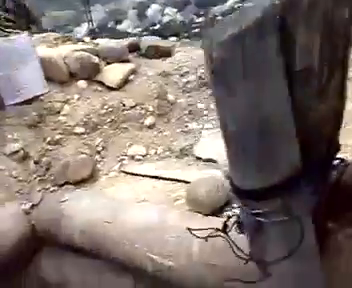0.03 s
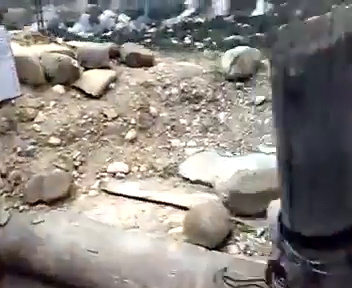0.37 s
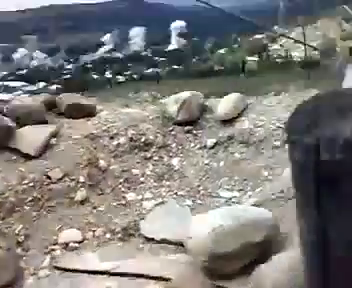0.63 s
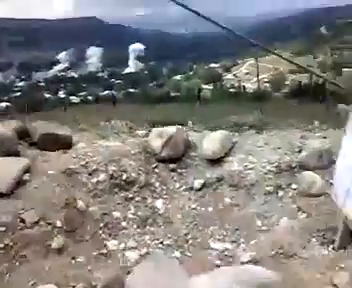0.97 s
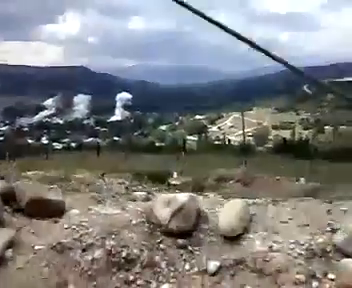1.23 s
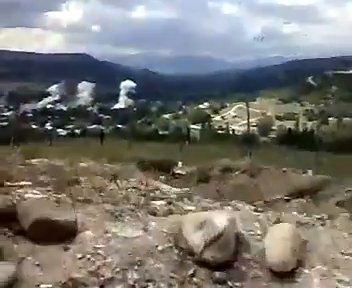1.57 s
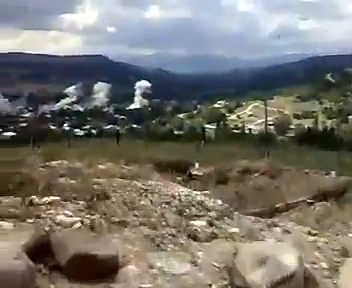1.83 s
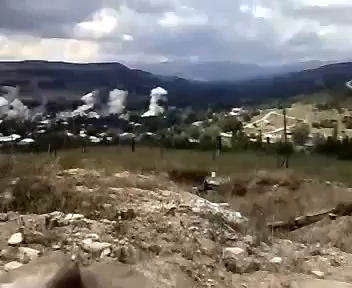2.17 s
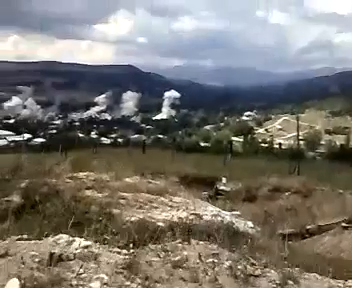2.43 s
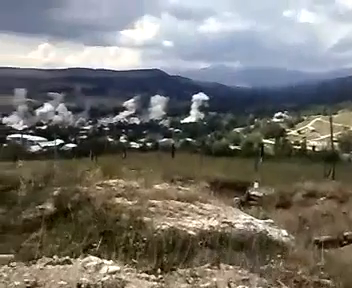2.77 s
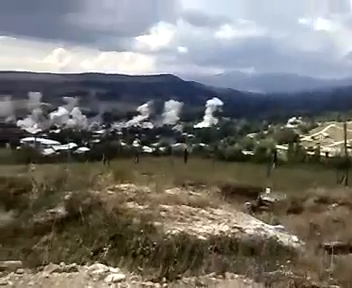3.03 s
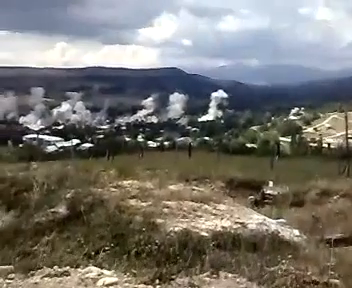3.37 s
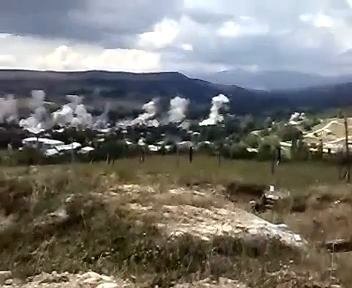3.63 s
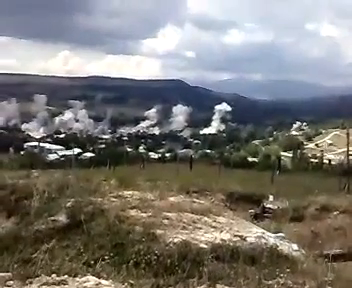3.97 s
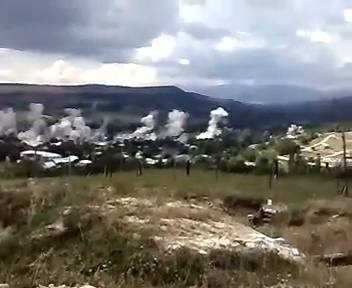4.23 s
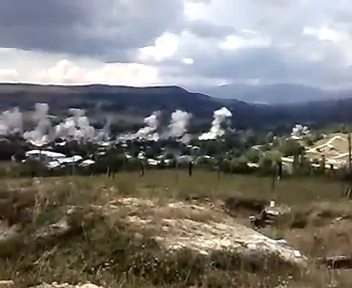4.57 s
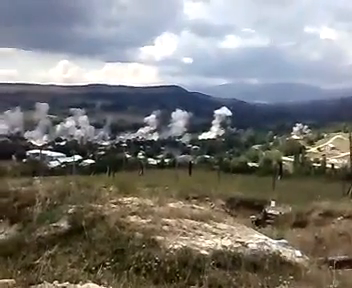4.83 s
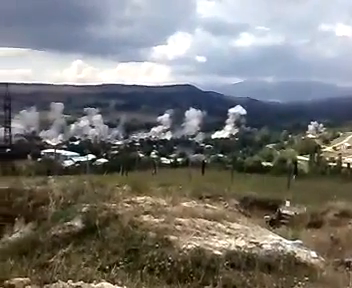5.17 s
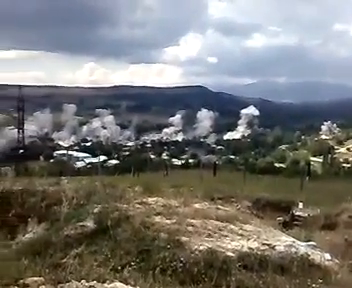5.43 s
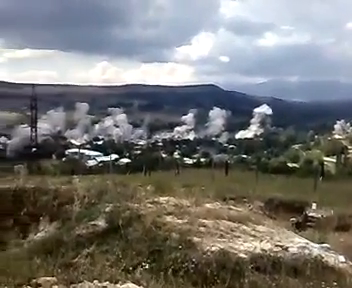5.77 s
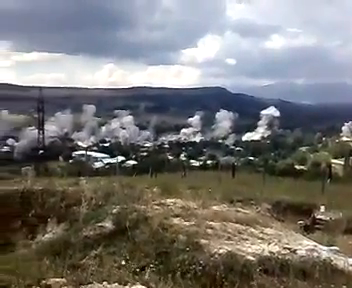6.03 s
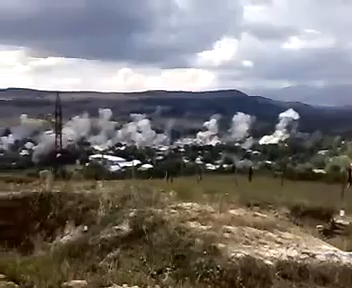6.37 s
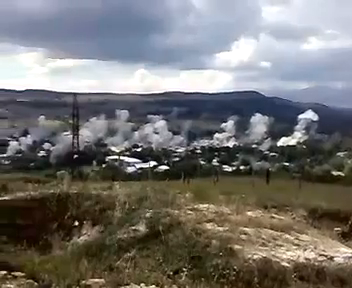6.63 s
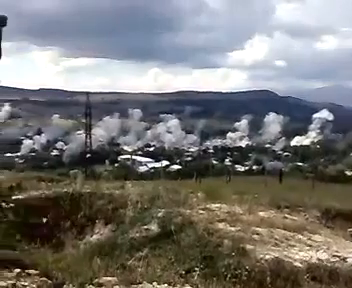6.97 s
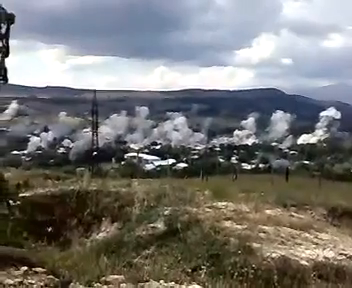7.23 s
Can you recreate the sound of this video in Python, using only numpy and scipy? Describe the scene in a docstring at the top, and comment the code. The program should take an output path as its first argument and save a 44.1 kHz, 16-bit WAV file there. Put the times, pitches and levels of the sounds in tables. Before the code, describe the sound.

Distant artillery shells explode in a rapid overlapping string of booms that roll across a valley, followed by wind gusts and a faint engine hum.

```python
"""Shellfire across a valley

A salvo is heard from a hilltop post through a small, overloading microphone. Each blast is a pressure
swing with a shock front, a clatter of near reflections and a long reverberant roll from the slopes.
Turbulent gusts rush over the microphone and buffet it, and grit ticks on its case.
Underneath, a small engine hums at harmonics of its firing rate in the low wash of the open air."""
import sys
import numpy as np
from scipy import signal
from scipy.fft import rfft, irfft
from scipy.io import wavfile

SR = 44100
rng = np.random.default_rng(int(sys.argv[2]) if len(sys.argv) > 2 else 0)


def unload_audio(sound):
    """Save the sound as a 16-bit wav file, at the path given as the first command line argument."""
    columns = np.transpose(np.atleast_2d(sound))
    # keep every value between -1 and 1, then stretch to whole-number steps
    steps = np.round(np.clip(columns, -1, 1) * 32767)
    wavfile.write(sys.argv[1], SR, steps.astype(np.int16))


N = 330309
TIME = np.arange(N) / SR

# Blasts and their hard echoes:
# start_s, thump_db, thump_hz, front_db, clatter_db, crack_db, clatter_t60_s
BLASTS = [(0.436, -4, 67.6, -27, -13.5, -16, 0.88), (0.619, 2, 60.3, -31, -2.5, -11, 0.2),
          (0.818, 8, 86.4, -3.5, -6.5, -10.5, 0.25), (1.046, 1, 78.6, -17, -15, -6, 0.4),
          (1.619, 5, 94.3, -9, -7, -5, 0.43), (1.683, -1, 80, -51, -10.5, -10, 0.39),
          (1.936, 1.5, 112.2, -3, -7, -2.5, 0.31), (2.281, -1, 59.3, -32, -12.5, -31.5, 0.47),
          (2.739, 4, 74.4, -2, -3.5, -6.5, 0.18), (2.783, 3, 52.8, -30, -9, -17, 0.27),
          (3.006, -1.5, 70, -36, -17, -21.5, 0.47), (3.32, -2.5, 76, -23, -14.5, -19, 0.32),
          (3.353, 1.5, 71, -30, -11, -16, 0.66), (3.743, 1.5, 53, -7, -6, -20, 0.096),
          (3.772, 2.5, 66.7, -5, 0.5, -23, 0.12), (3.846, -1, 53, -14, -8, -23, 0.17),
          (4.262, 0, 58.8, -39, -12.5, -30, 0.22)]


def gain_of(db):
    """Amplitude ratio of a level in decibels."""
    return 10 ** (np.asarray(db) / 20)


def unit_rms(x):
    """Normalisation to an rms of 1."""
    return x / np.sqrt(np.mean(x ** 2) + 1e-20)


def add(mix, start_s, sound):
    """Superposition of a sound on the mix."""
    part = mix[max(round(start_s * SR), 0):][:len(sound)]
    part += sound[:len(part)]


def noise(spectrum, size=N):
    """Random-phase noise of rms 1, shaped by rows of frequency_hz, level_db."""
    hz = np.fft.rfftfreq(size, 1 / SR)
    corner_hz, db = np.transpose(spectrum)
    magnitude = gain_of(np.interp(np.log(hz + 1), np.log(corner_hz + 1), db)) * (hz > 12)
    return unit_rms(irfft(magnitude * np.exp(2j * np.pi * rng.random(len(hz))), size))


def wander(rate_hz):
    """Smooth random fluctuation of rms 1: low-passed Gaussian noise."""
    hz = np.fft.rfftfreq(N, 1 / SR)
    return unit_rms(irfft(rfft(rng.standard_normal(N)) * np.exp(-(hz / rate_hz) ** 2), N))


def lowpass(x, hz):
    """Steep linear-phase band limit."""
    return signal.oaconvolve(x, signal.firwin(401, hz, window=("kaiser", 9), fs=SR), "same")


def decay(t, t60_s):
    """Exponential decay of 60 dB per reverberation time."""
    return np.exp(-np.log(1000) * t / t60_s)


def air(level_db=-30.5, swell_db=1):
    """Ambient noise: the low, slowly fluctuating wash of the open valley."""
    # Ambient spectrum: frequency_hz, level_db
    spectrum = [(20, 2), (50, 4), (120, 1), (200, -6.5), (300, -11.5), (450, -13.5), (650, -16), (800, -16),
                (1650, -17), (2150, -29), (3200, -27.5), (4500, -40.5), (7500, -55)]
    return gain_of(level_db + swell_db * wander(0.96)) * noise(spectrum)


def engine(firing_hz=24.01, drift=0.0022, knock_db=-44, knock_turns=0.8):
    """Periodic firing gives a governed four-stroke its harmonics; it rattles on both turns of a cycle."""
    # Engine tones: harmonic_number, level_db
    harmonics = [(2, -40), (3, -45.5), (4, -42), (5, -38.5), (6, -48), (10, -53.5), (17, -62), (19, -54.5),
                 (20, -54.5), (23, -56), (25, -54.5), (27, -47.5), (29, -52.5), (38, -52.5), (65, -54)]
    # Rattle spectrum: frequency_hz, level_db
    knock_spectrum = [(150, -15.5), (400, -10), (660, 9.5), (850, -6), (1700, -16), (2150, -26),
                      (3200, -19), (5000, -15), (7500, -24)]
    # The engine grows clearer as the microphone turns: time_s, low_tones_db, overtones_and_rattle_db
    gains = [(0, -1.5, -5.5), (3, -8, -5), (4.999, -0.5, -5), (6, -5, -1.5), (6.902, 5, 0.5), (7.5, 1.5, 0)]
    times, low_db, high_db = np.transpose(gains)
    low, high = (gain_of(np.interp(TIME, times, db)) for db in (low_db, high_db))
    cycles = np.cumsum(firing_hz * (1 + drift * wander(2))) / SR
    tones = 0
    for number, db in harmonics:
        tone = np.sin(2 * np.pi * (number * cycles + rng.random()))
        tones += (low if number < 10 else high) * gain_of(db) * tone
    rattle = unit_rms(noise(knock_spectrum) * np.exp(-(2 * cycles % 1) / knock_turns))
    return np.sqrt(2) * tones + high * gain_of(knock_db) * rattle


def reverberant_gain(hits, t60_s, rise_s=0.0048, earlier_db=-4):
    """Incoherent echoes add in power: those of hits (start_s, level_db) and of earlier shells."""
    power = (gain_of(earlier_db) * decay(TIME, t60_s)) ** 2
    for start_s, db in hits:
        age = np.maximum(TIME - start_s, 0)
        power += (gain_of(db) * (1 - np.exp(-age / rise_s)) * decay(age, t60_s)) ** 2
    return np.sqrt(power)


def valley(rumble_db=-24, wash_db=-18, split_hz=420, lumpy_db=4.0):
    """Reverberation: the slopes return thumps as a lumpy rumble and clatter as a smooth, longer wash."""
    # Reverberation spectrum: frequency_hz, level_db
    spectrum = [(20, -13.5), (50, 5.5), (110, -4.5), (170, -1.5), (260, -10), (370, -9.5), (700, -18.5),
                (1600, -19.5), (2300, -33), (3300, -32.5), (7000, -57)]
    # Long low echo from the far ridge: crest_s, level_db, half_length_s
    ridge_echo = (2.57, -21.5, 0.29)
    thumps = reverberant_gain([(s, db) for s, db, *_ in BLASTS], t60_s=1.7)
    clatters = reverberant_gain([(s, db) for s, _, _, _, db, _, _ in BLASTS], t60_s=3.7)
    crest_s, ridge_db, half_length_s = ridge_echo
    ridge = gain_of(ridge_db) * np.exp(-((TIME - crest_s) / half_length_s) ** 2 / 2)
    roll = noise(spectrum)
    rumble = lowpass(roll, split_hz)
    lumps = gain_of(lumpy_db * wander(30)) * np.hypot(gain_of(rumble_db) * thumps, ridge)
    return lumps * rumble + gain_of(wash_db) * clatters * (roll - rumble)


def swell(age, rise_s, fall_s, wake_db=-24.5, wake_s=0.61):
    """Envelope of a gust about its crest: growth, decay and a weak, slowly dying wake."""
    roundness = 1.175  # 1 is a sharp crest, 2 a bell
    before, after = np.maximum(-age, 0), np.maximum(age, 0)
    wake = gain_of(wake_db) * np.exp(-after / wake_s)
    dying = np.maximum(np.exp(-(after / fall_s) ** roundness), wake)
    return np.exp(-(before / rise_s) ** roundness) * dying


def gust_gains(buffet_lag_s=0.021, hiss_exponent=1.33):
    """Overlapping gusts add in power, giving the envelopes of rush, hiss and buffeting."""
    # Gusts: crest_s, rush_db, hiss_db, buffet_db, rise_s, fall_s
    gusts = [(0.01, -21.5, -36, -18.5, 0.09, 0.075), (0.255, -24, -36, -21, 0.002, 0.022),
             (0.31, -28, -37, -26.5, 0.012, 0.03), (0.393, -18.5, -25.5, -4, 0.044, 0.089),
             (0.56, -31.5, -39, -17.5, 0.21, 0.39), (0.895, -24.5, -30.5, -18, 0.09, 0.097),
             (1.115, -25.5, -34.5, -18, 0.03, 0.11), (3.411, -23, -28.5, -12.5, 0.025, 0.076),
             (3.621, -14.5, -18.5, -10, 0.085, 0.14), (3.841, -16, -21.5, -16, 0.15, 0.39),
             (3.989, -7.5, -15, -23, 0.029, 0.073), (4.04, -6.5, -15.5, -3, 0.068, 0.05),
             (4.33, -40, -38, -24, 0.021, 0.027), (4.48, -14, -24.5, -27, 0.056, 0.088),
             (4.573, -16.5, -27, -19, 0.09, 0.097), (5.28, -25, -29.5, -12, 0.038, 0.081),
             (5.375, -27, -39.5, -21.5, 0.085, 0.17), (6.092, -17.5, -21, -2.5, 0.044, 0.087),
             (6.24, -38, -51.5, -10.5, 0.02, 0.057), (6.39, -32.5, -40.5, -23, 0.18, 0.14)]
    t, power = TIME[::64], 0
    for crest_s, rush_db, hiss_db, buffet_db, rise_s, fall_s in gusts:
        flow = swell(t - crest_s, rise_s, fall_s)
        rush = gain_of(rush_db) * flow
        hiss = gain_of(hiss_db) * flow ** hiss_exponent  # grows faster than the rush
        buffet = gain_of(buffet_db) * swell(t - crest_s - buffet_lag_s, 0.026, 0.92 * fall_s)
        power += np.array([rush, hiss, buffet]) ** 2
    return [np.interp(TIME, t, np.sqrt(p)) for p in power]


def wind(flutter_db=1.36, shed_hz=29, unsteady=.2, eddies_db=-4, rush_db=2, hiss_db=-1, roar_db=6):
    """Turbulent flow rushes and hisses over the microphone; vortex shedding from its case shakes it."""
    # Spectra of the flow noise: frequency_hz, level_db
    eddy_spectrum = [(10, 0.5), (28, -1), (60, -3.5), (130, -15), (250, -23), (600, -64)]
    rush_spectrum = [(30, -2), (110, 4.5), (200, -3), (340, -5.5), (430, -2), (570, -0.5), (900, -4.5),
                     (1400, -4.5), (1800, -9), (2200, -16.5), (3200, -27), (7500, -55)]
    hiss_spectrum = [(1500, -43), (2200, -18.5), (2500, -3.5), (2800, -3), (3200, -1), (3900, -5),
                     (4600, -14.5), (5600, -16), (7500, -31)]
    roar_spectrum = [(400, -16.5), (1000, -2), (1350, 3), (1850, 1), (2250, -10), (2700, -40)]
    rush, hiss, buffet = gust_gains()
    vortex_hz = shed_hz * np.exp(unsteady * wander(20.27))
    shedding = unit_rms(np.sin(2 * np.pi * np.cumsum(vortex_hz) / SR))
    shaking = shedding + gain_of(eddies_db) * noise(eddy_spectrum)
    flow = gain_of(rush_db) * rush * noise(rush_spectrum)
    flow += gain_of(hiss_db) * hiss * noise(hiss_spectrum)
    flow += gain_of(roar_db) * rush ** 2 * noise(roar_spectrum)  # only the fastest air roars
    return gain_of(flutter_db * wander(59)) * flow + buffet * shaking


def grit(gain_db=-6, decay_s=0.0096):
    """Impacts of grit on the microphone case give dry, quickly damped ticks."""
    # Impacts: start_s, level_db
    ticks = [(0.2535, -38.5), (0.6544, -24.5), (3.3204, -38), (3.6745, -13), (3.907, -13), (4.4926, -19)]
    # Tick spectrum: frequency_hz, level_db
    spectrum = [(1500, -39.5), (3500, 16.5), (6000, 12.5), (7500, -12)]
    out, t = np.zeros(N), np.arange(SR // 20) / SR
    for start_s, db in ticks:
        add(out, start_s, gain_of(db + gain_db) * noise(spectrum, len(t)) * np.exp(-t / decay_s))
    return out


def whooshes():
    """Flow noise with hollow spectral peaks swells briefly at the leading edge of some gusts."""
    # Swells of air: crest_s, level_db, half_length_s
    swells = [(0.364, -16.5, 0.026), (6.11, -19.5, 0.054)]
    # Whoosh spectrum: frequency_hz, level_db
    spectrum = [(150, -3), (250, 0), (340, 6), (440, -3.5), (560, 1.5), (750, -1.5), (1500, -48)]
    envelope = sum(gain_of(db) * np.exp(-((TIME - crest_s) / half_length_s) ** 2 / 2)
                   for crest_s, db, half_length_s in swells)
    return noise(spectrum) * envelope


def thump(t, hz, crest_cycles=0.61, lead_cycles=0.2617, lead_s=0.0038):
    """A damped pressure swing, a short dip and then longer lobes, with the time of its first upstroke."""
    cycles = hz * t + lead_cycles * (1 - np.exp(-t / lead_s))
    age = hz * t / crest_cycles  # 1 at the crest of the envelope
    swing = -np.sin(2 * np.pi * cycles) * age * np.exp((1 - age ** 2) / 2)
    return swing, t[np.argmax(cycles > .5)]


def scatter(spectrum, t, rise_s, hold_s, t60_s):
    """Diffuse reflections crowd in, hold a moment and decay."""
    return noise(spectrum, len(t)) * (1 - np.exp(-t / rise_s)) * decay(np.maximum(t - hold_s, 0), t60_s)


def blasts(front_s=.0016, grain_db=3.5):
    """Blast waves: a shock front rides each thump; ground and houses scatter it, treble dying first."""
    # Spectra of the low clatter and the bright crack: frequency_hz, level_db
    clatter_spectrum = [(20, -5), (55, -2.5), (110, 4.5), (145, 0.5), (200, 1.5), (290, -10.5),
                        (370, -10.5), (460, -17.5), (650, -24), (1500, -25), (4000, -69)]
    crack_spectrum = [(100, -9.5), (350, 7), (650, 5.5), (950, 2.5), (1500, -3), (1950, -6), (2400, -19.5),
                      (3400, -20), (5000, -30.5), (7500, -57)]
    out, t = np.zeros(N), np.arange(SR // 2) / SR
    grain = gain_of(grain_db * wander(290))  # uneven scattering
    front = (1 - t / front_s) * np.exp(-t / front_s)
    for start_s, thump_db, thump_hz, front_db, clatter_db, crack_db, t60_s in BLASTS:
        swing, upstroke_s = thump(t, thump_hz)
        shock_s = start_s + upstroke_s
        clatter = scatter(clatter_spectrum, t, rise_s=0.004, hold_s=0.017, t60_s=t60_s)
        crack = scatter(crack_spectrum, t, rise_s=0.0063, hold_s=0.018, t60_s=0.1)
        crack *= unit_rms(grain[round(start_s * SR):][:len(t)])
        add(out, start_s, gain_of(thump_db) * swing + gain_of(crack_db) * crack)
        add(out, shock_s, gain_of(front_db) * front + gain_of(clatter_db) * clatter)
        # Rough ground returns the front smeared, from nearby and then from further off.
        echo = scatter(crack_spectrum, t, rise_s=0.0015, hold_s=0, t60_s=0.014)
        for delay_s, echo_db in (0.013, -5), (0.029, -10):
            add(out, shock_s + delay_s, gain_of(front_db + echo_db) * echo)
    return out


def scene():
    """Superposition of all sources at one microphone."""
    return (blasts() + valley() + wind() + whooshes() + grit() + engine() + air())[None]


def record(dry, band_hz=7700, edge_hz=15600, ceiling=.7, knee=5, distortion_db=1):
    """Saturation in a narrow-band microphone: only distortion of the peaks reaches the top octave."""
    pressure = lowpass(dry[0], band_hz)
    clipped = pressure / (1 + abs(pressure / ceiling) ** knee) ** (1 / knee)
    body = lowpass(clipped, band_hz)
    return lowpass(body + gain_of(distortion_db) * (clipped - body), edge_hz)[None]


dry = scene()
out = record(dry)
unload_audio(out)
```